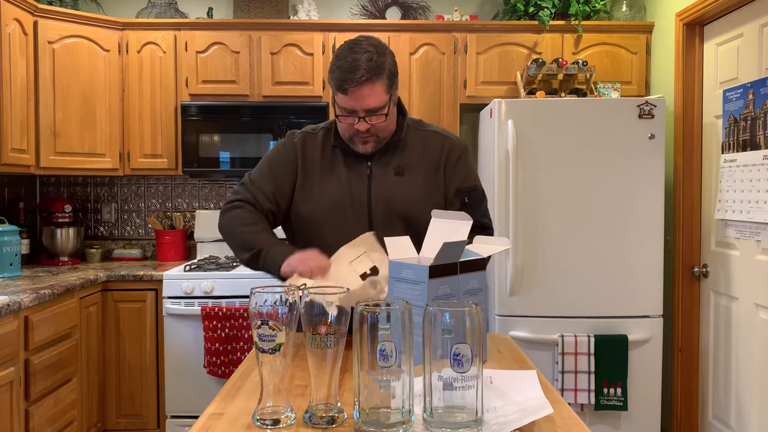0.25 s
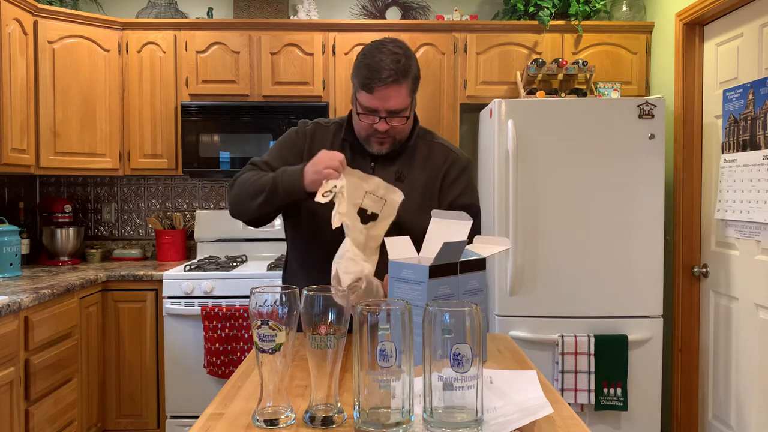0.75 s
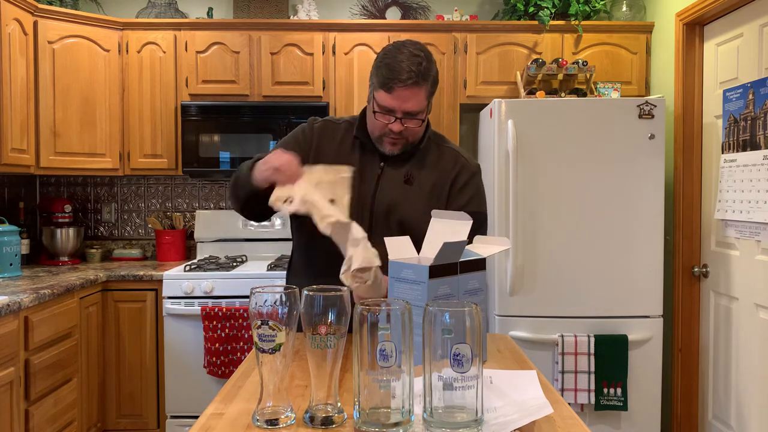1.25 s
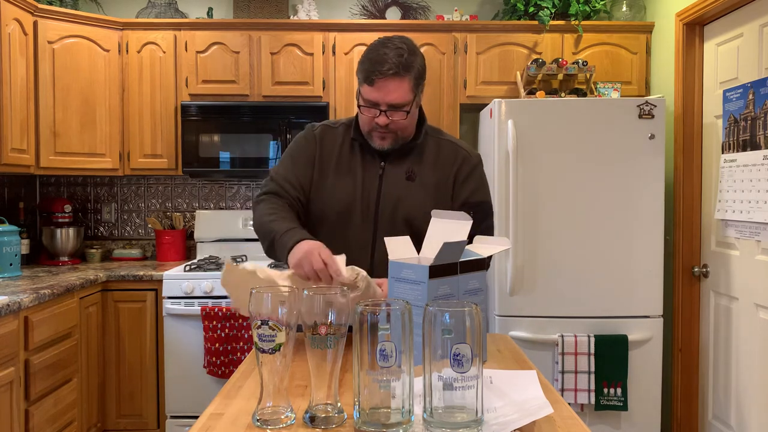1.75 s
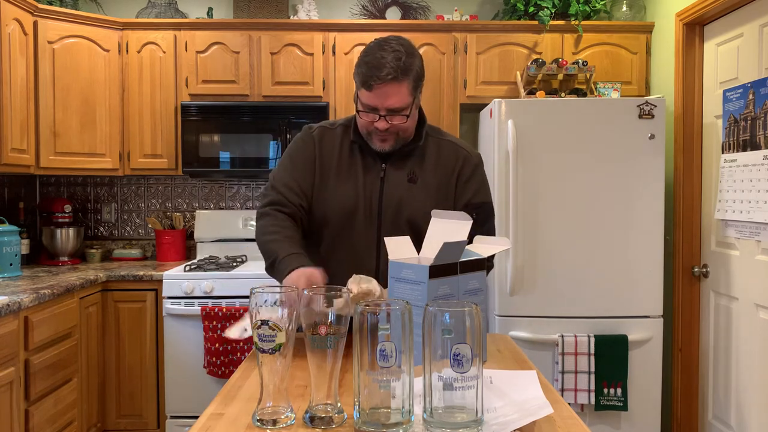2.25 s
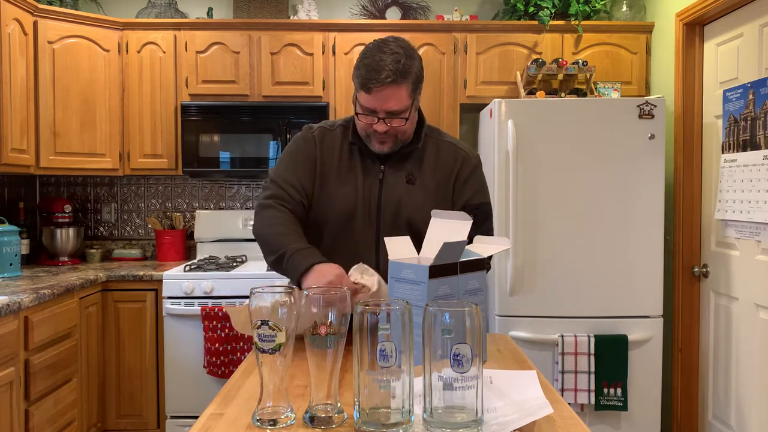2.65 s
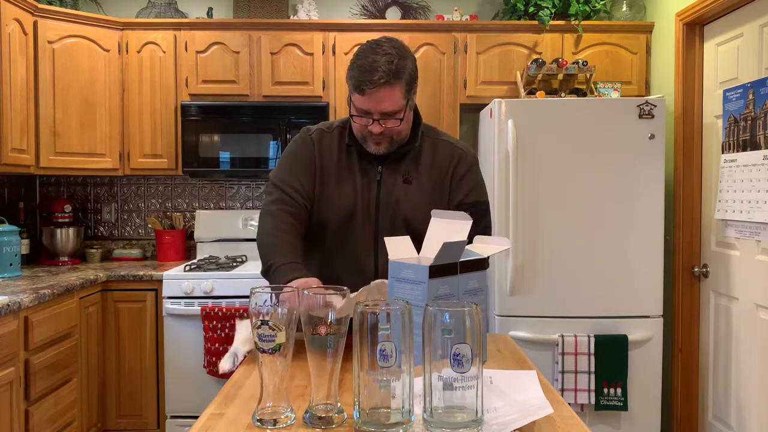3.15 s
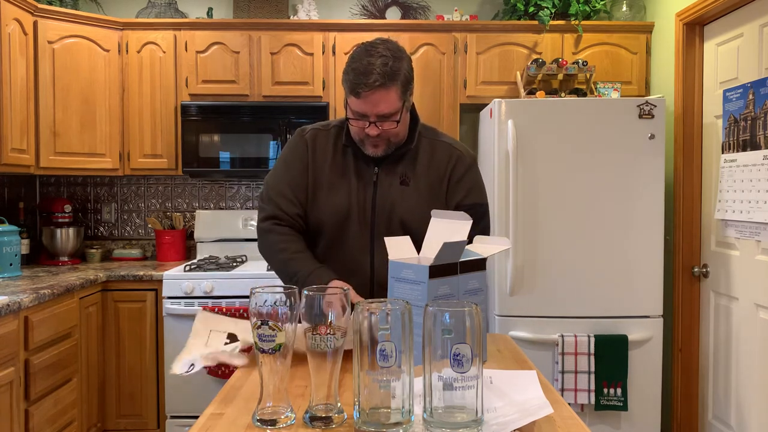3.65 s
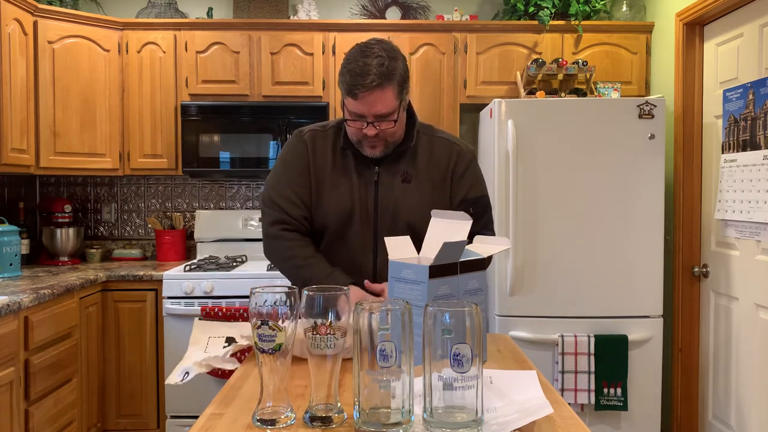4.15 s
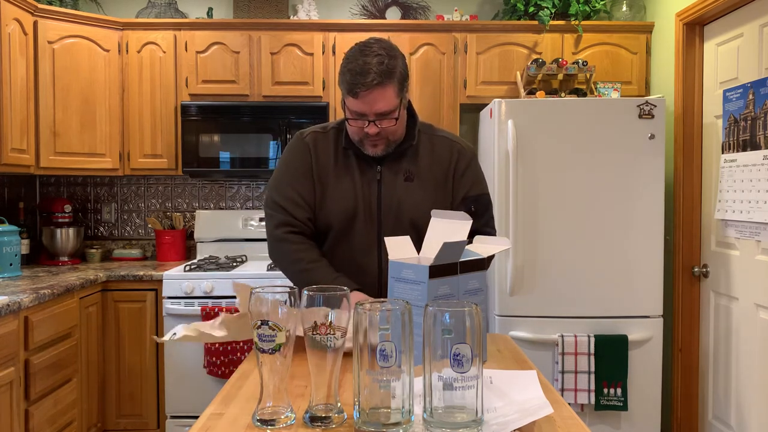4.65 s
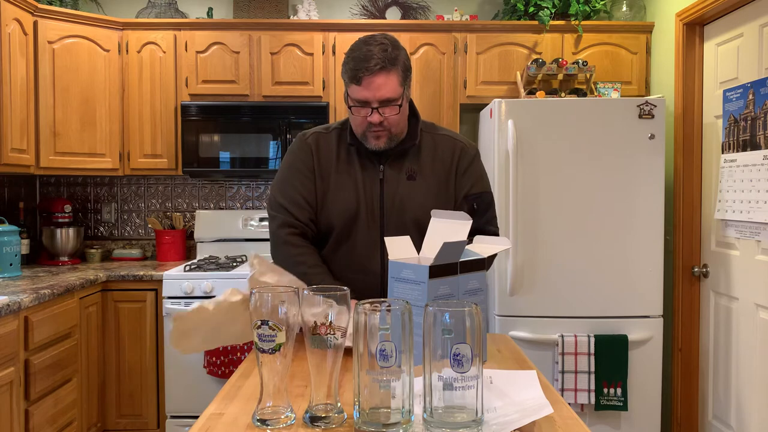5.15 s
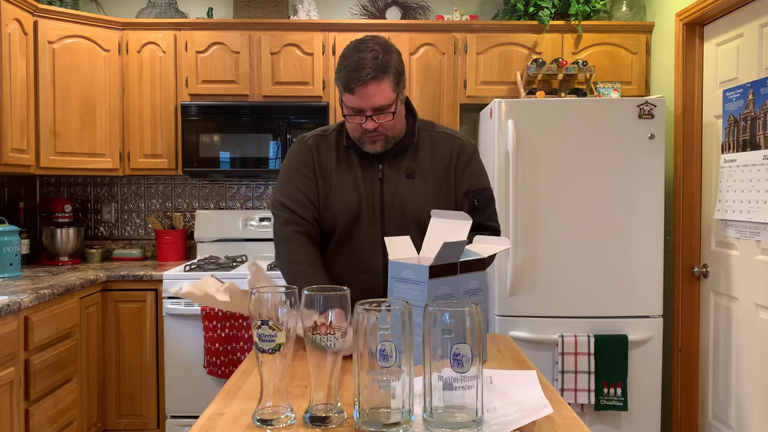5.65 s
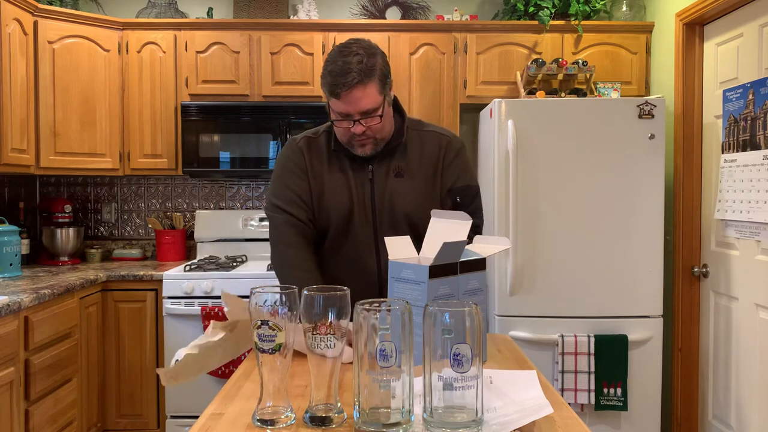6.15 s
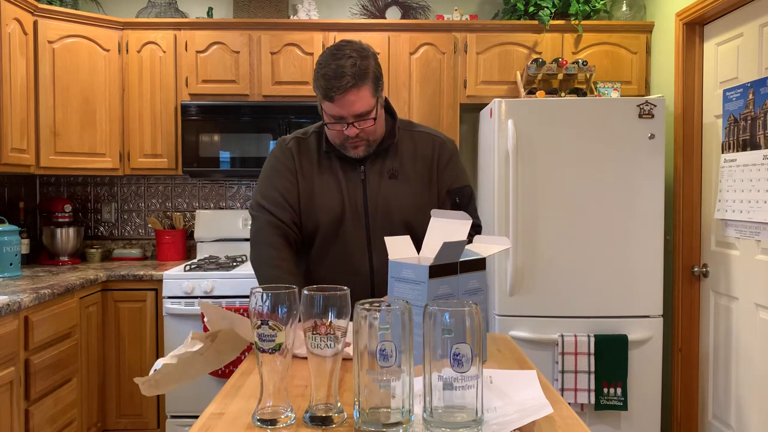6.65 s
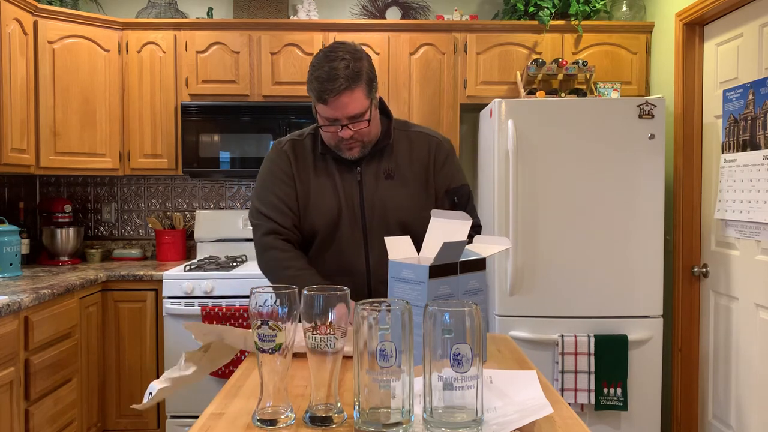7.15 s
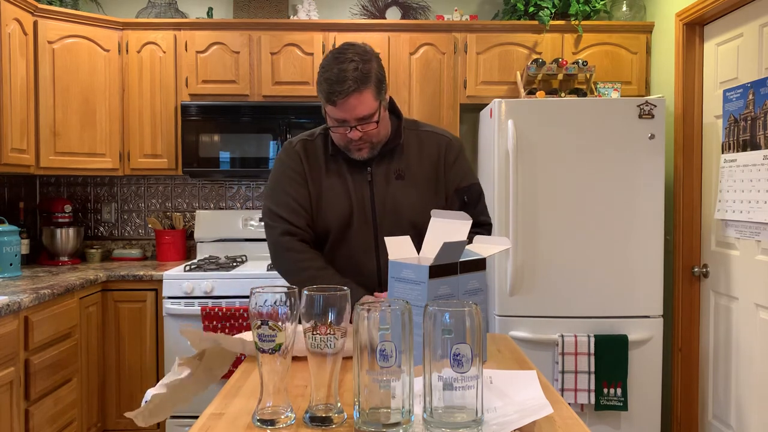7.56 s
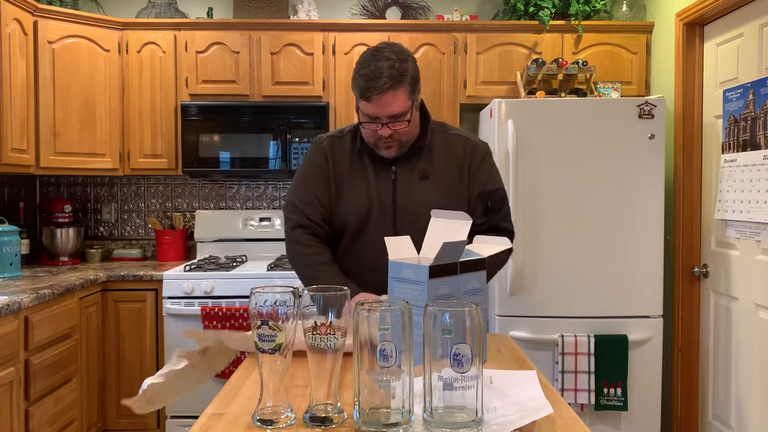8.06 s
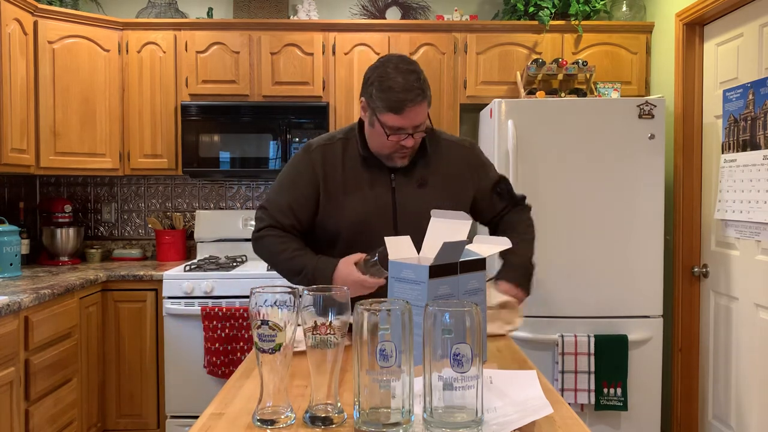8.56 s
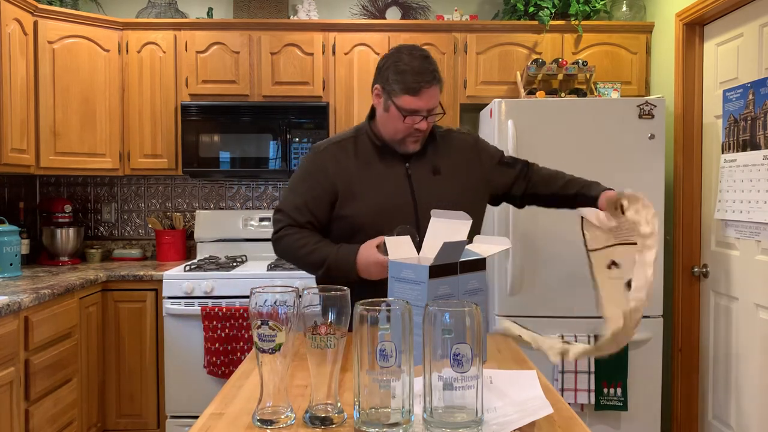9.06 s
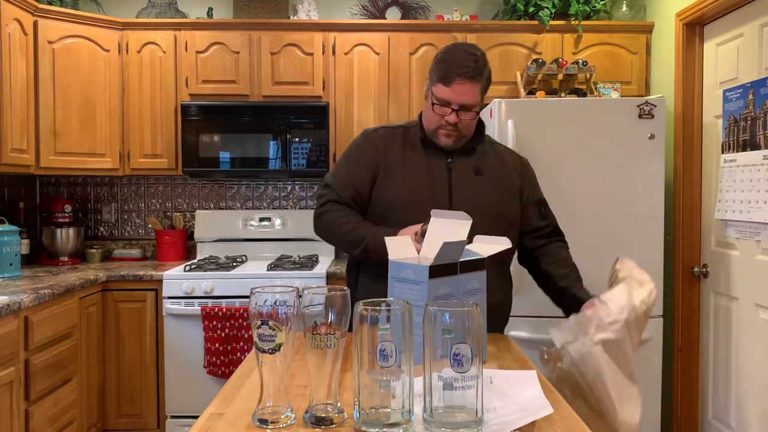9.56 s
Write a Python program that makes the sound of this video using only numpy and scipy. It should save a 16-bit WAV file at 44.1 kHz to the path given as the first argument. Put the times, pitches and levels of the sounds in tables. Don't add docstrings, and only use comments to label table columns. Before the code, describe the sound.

A reverberant kitchen with faint low room rumble and unsteady refrigerator hum, heard in stereo from a few metres away. From 0 s stiff packing paper crunches, with a low pop, boomy folds and crackle; bright snaps cluster near 0.75 to 0.9 s. Sharper pops and hissing slides run from 1.6 to 2 s, a strong tear cracks at 2.4 s, and a dense crumple peaks around 2.7 to 3 s. Hard snaps hit at 3.5 s, then uneven rustles follow. From 5.2 to 5.9 s the paper drags and pops loudly, with a flap and light touch at 5.8 s. At 6.4 s a wrapped glass knocks the wooden counter hard, hollow and woody, and standing glasses ring thinly. Softer, sparser crackles follow, with snaps near 7.9 and 8.5 s, thinning to near quiet around 9.4 s before a final small pop and light hissing rustle at 9.7 s.

```python
import sys
import numpy as np
from scipy import signal
from scipy.fft import rfft, irfft, next_fast_len
from scipy.io import wavfile
from scipy.ndimage import uniform_filter1d, minimum_filter1d, map_coordinates

SR = 44100
rng = np.random.default_rng(int(sys.argv[2]) if len(sys.argv) > 2 else 0)


def to_wav(sig):
    pcm = np.clip(np.atleast_2d(sig), -1, 1) * 32767
    pcm = np.round(pcm).astype(np.int16)
    wavfile.write(sys.argv[1], SR, pcm.T)


def magnitude_from_level(level_db):
    exponent = np.asarray(level_db, float) / 20
    return 10 ** exponent


N = 433062


def unit(x):
    return x / np.sqrt(np.mean(x ** 2) + 1e-20)


def along(points, hz):
    f, v = np.transpose(points)
    return np.interp(np.log(hz + 1), np.log(f + 1), v)


def curves(rows):
    s, *columns = np.transpose(rows)
    return [np.interp(np.arange(N) / SR, s, column) for column in columns]


def wobble(rate):
    points = rng.standard_normal(int(N * 400 / SR) + 4)
    return map_coordinates(points, [np.arange(N) * rate / SR])


def filtered(x, response):
    m = next_fast_len(N + SR // 2)
    return irfft(rfft(x, m) * response(np.fft.rfftfreq(m, 1 / SR)), m)[..., :N]


def coloured(x, spectrum):
    return unit(filtered(x, lambda hz: magnitude_from_level(along(spectrum, hz))))


def ring(modes, t, attack, scatter_db=0):
    total = 0
    for hz, db, t60 in modes:
        level_db = db - scatter_db * rng.standard_normal()
        total = total + magnitude_from_level(level_db - 60 * t / t60) * np.sin(2 * np.pi * hz * t)
    return total * (1 - np.exp(-t / attack))


def swell(t, middle_s, length_s):
    return np.exp(-np.square(2 * (t - middle_s) / length_s))


# (frequency [Hz], level [dB])
ROOM_AIR = [(15, -58), (25, -68), (37, -11), (95, 3.5), (167, 4.5), (438, -8), (501, -0.5), (588, -23.5),
            (1630, -23), (3260, -64), (15000, -46)]
# (time [s], level [dB])
HUM = [(0.0, -54), (0.93, -59.5), (6.18, -58.5), (6.48, -53), (6.67, -57), (7.63, -65), (9.6, -68.5),
       (9.82, -58)]


def background():
    t = np.arange(N) / SR
    air = magnitude_from_level(-55.0 + 1.78 * wobble(6.6)) * coloured(rng.standard_normal((2, N)), ROOM_AIR)
    hum = np.sin(2 * np.pi * 59.2 * t + 0.74 * wobble(2.3))
    hum *= magnitude_from_level(curves(HUM)[0] + 5.5 + 1.6 * wobble(6.5))
    whine = magnitude_from_level(-58.5 + 1.5 * wobble(7)) * np.sin(2 * np.pi * 506 * t + 0.3 * wobble(9))
    whine_fade = np.clip(t - 7.1, 0, 1)
    return air + (hum + whine * whine_fade) * [[1], [0.3]]


def creases(per_second, spread_db, clump_db):
    fires = rng.random(N) < per_second / SR
    size = magnitude_from_level(spread_db * np.minimum(rng.exponential(size=N), 2.2)) * rng.standard_normal(N)
    clumps = magnitude_from_level(clump_db * wobble(25) + 0.5 * clump_db * wobble(90))
    return clumps * (unit(fires * size) + 1.21 * rng.standard_normal(N))


# (time [s], effort [dB], sliding [dB])
HANDS = [(0.0, -38, -6), (0.7, -47, 3), (1.35, -45, -3.5), (1.55, -46.5, -20), (1.58, -41, 2.5),
         (2.15, -44.5, -1), (2.75, -36, -3.5), (3.35, -50, -6), (4.14, -38.5, -9.5), (5.2, -50.5, 2),
         (5.63, -41, -3.5), (5.97, -54.5, 6), (6.35, -42, 1.5), (7.05, -56, 2.5), (8.52, -43, 3),
         (9.1, -50.5, -0.5), (9.37, -75.5, -9.5), (9.82, -46, 10.5)]
# (frequency [Hz], level [dB])
BOOM = [(59, -24.5), (100, -11), (135, -23.5), (189, 5), (227, 3), (456, 4), (900, -10), (1170, -22),
        (1980, -120)]
CRUMPLE = [(380, -30), (650, -3), (1000, 0), (1500, -3), (2200, -6), (3200, -10), (4400, -18), (6500, -45)]
CRACKLE = [(2600, -0.5), (3600, -3.5), (5500, -2.5), (8000, -4.5), (9500, -59)]
HISS = [(7500, -12), (9000, 3.5), (11000, 0), (12600, -2.5), (14000, -9.5), (15600, -9), (16500, -79)]
FIZZ = [(12000, -34.5), (13500, 5), (15600, -3), (16500, -67.5)]


def paper():
    effort_db, slide_db = curves(HANDS)
    pops, (low, middle, edge) = snaps()
    drag_low, drag, drag_edge = drags()
    slip = slips()
    big = creases(per_second=500, spread_db=3.0, clump_db=2.5)
    small = creases(per_second=2500, spread_db=1.0, clump_db=1.5)

    boom_level = magnitude_from_level(0.68 * (effort_db + 46.5) - 54.0) + magnitude_from_level(-8.0) * low + drag_low
    crumple_level = magnitude_from_level(effort_db - 9.5) + magnitude_from_level(-14.5) * middle + drag
    crackle_level = magnitude_from_level(effort_db + 0.7 * slide_db - 11.5) + magnitude_from_level(-10.0) * edge + drag_edge
    hiss_level = magnitude_from_level(effort_db + 0.95 * slide_db - 15.0) + magnitude_from_level(-16.0) * edge + magnitude_from_level(-5.5) * drag_edge + slip
    fizz_level = magnitude_from_level(effort_db + 0.91 * slide_db - 25.0) + magnitude_from_level(-30.5) * edge + magnitude_from_level(-3) * slip

    boom = boom_level * coloured(big, BOOM)
    crumple = crumple_level * coloured(0.45 * big + small, CRUMPLE)
    crackle = crackle_level * coloured(0.049 * big + small, CRACKLE)
    hiss = hiss_level * coloured(0.42 * big + small, HISS)
    fizz = fizz_level * coloured(small, FIZZ)
    return pops + rustles(big + small) + boom + crumple + crackle + hiss + fizz


# (time [s], peak level [dB], pitch [Hz], time to fall 60 dB [s])
POPS = [(0.017, -16.5, 474, 0.11), (0.452, -27, 950, 0.018), (0.738, -24, 2300, 0.26),
        (0.745, -20, 3480, 0.054), (0.746, -29, 630, 0.27), (1.948, -21.5, 910, 0.14),
        (2.712, -32, 945, 0.051), (2.928, -33, 1110, 0.044), (4.579, -27, 1410, 0.068),
        (5.152, -37, 800, 0.068), (5.386, -27, 880, 0.11), (5.608, -16, 1700, 0.042),
        (6.274, -26, 830, 0.047), (7.51, -31, 2300, 0.092), (7.645, -34, 1160, 0.072),
        (7.67, -37, 1900, 0.12), (8.2, -35, 1500, 0.093), (8.565, -31, 1600, .12),
        (8.965, -32, 1020, 0.083), (1.653, -20, 2600, 0.26), (1.701, -23, 950, 0.18),
        (1.74, -21.5, 446, 0.095), (1.86, -15.5, 940, 0.043), (2.318, -26, 1050, 0.18),
        (2.466, -21, 1360, 0.094), (2.748, -26, 770, 0.037), (2.863, -22, 950, 0.13),
        (2.975, -15.5, 555, 0.057), (3.544, -15.5, 1390, 0.11), (4.017, -21, 755, 0.041),
        (4.184, -22.5, 470, 0.06), (4.66, -25.5, 537, 0.12), (4.898, -24.5, 1300, 0.59),
        (5.203, -30, 470, 0.12), (5.403, -19, 920, 0.2), (5.467, -20.5, 1020, 0.12),
        (5.581, -19, 1410, 0.064), (5.62, -14.5, 1820, 0.05), (5.821, -23, 1980, 0.045),
        (6.7, -27, 1140, 0.28), (7.468, -30, 960, 0.34), (7.549, -25, 477, 0.031),
        (7.612, -28.5, 1000, 0.66), (8.151, -22.5, 1010, 0.091), (8.271, -24.5, 890, 0.27),
        (9.693, -25.5, 1010, 0.22)]
# (time [s], peak level [dB], edge level [dB], boom level [dB], time to fall 60 dB [s])
FLURRIES = [(0.201, -30.5, -7, -11, 0.42), (0.73, -35, 3.5, -15, 0.078), (0.886, -21.5, -3, -25, 0.2),
            (0.906, -17.5, -19, -18, 0.21), (1.102, -35, -35, -15, 0.47), (1.205, -25, -24, -18, 0.23),
            (1.894, -23.5, -2, -11, 0.087), (2.123, -28, -16, -7, 0.075), (2.361, -20.5, -0.5, -8, 0.21),
            (2.945, -24.5, -13, -3, 0.42), (3.019, -19.5, -9, -24, 0.22), (3.405, -25.5, -10, -16, 0.55),
            (3.535, -25.5, -8, -22, 0.56), (3.915, -21.5, -12.5, -23, 0.44),
            (4.266, -22.5, -31, -17, 0.089), (4.501, -29.5, -9, -3, 0.27), (4.736, -25.5, -44, -10, 0.17),
            (5.078, -27, -37, -11, 0.24), (5.17, -26.5, -11, -10, 0.16), (6.119, -31, -4, -8, 0.47),
            (6.262, -29, 4, 0, 0.1), (6.809, -26.5, -6, -13, 0.13), (7.303, -29.5, -10, -1, 0.22),
            (7.361, -32.5, -13, -11, 0.12), (7.408, -25.5, -27, -9, 0.095), (7.456, -33, -24, 1.5, 0.11),
            (7.879, -19, -10, -30, 0.14), (7.981, -35, -50, -6, 0.13), (8.379, -39, -8, -14, 0.18),
            (8.524, -23.5, -12, -9.5, 0.18), (8.645, -21.5, -15, -4, 0.095), (9.105, -24, -29, -20, 0.19)]


def snaps():
    pops, flurry = np.zeros(N + SR), np.zeros((3, N + SR))
    t = np.arange(SR // 3) / SR
    start = 1 - np.exp(-t / 0.0007)
    events = []
    for s, db, edge_db, boom_db, t60 in FLURRIES:
        panel_hz = 492 * np.exp(0.053 * rng.standard_normal())
        events.append((s, db, panel_hz, -12, boom_db, 0, edge_db, t60))
    for s, db, hz, t60 in POPS:
        events.append((s, db, hz, -2, -13, -3.5, -22, t60))

    for s, db, hz, pop_db, boom_db, folds_db, edge_db, t60 in events:
        at = round(s * SR)
        dying = magnitude_from_level(db - 60 * t / np.clip(t60, 0.02, 0.4)) * start
        pop = magnitude_from_level(db + pop_db - 60 * t * hz / 11) * np.sin(2 * np.pi * hz * t) * start
        panel = unit(signal.lfilter(*signal.iirpeak(hz, 5, SR), rng.standard_normal(len(t))))
        pops[at:at + len(t)] += pop + magnitude_from_level(-17) * dying * panel
        build_up = 0.59 + 0.73 * (1 - np.exp(-t / (0.16 * abs(t60) + 1e-4)))
        flurry[:, at:at + len(t)] += magnitude_from_level([[boom_db], [folds_db], [edge_db]]) * dying * build_up
    return pops[:N], flurry[:, :N]


# (middle time [s], level [dB], length [s], pitch [Hz])
RUSTLES = [(0.03, -42, 0.11, 800), (0.23, -39.5, 0.08, 535), (0.245, -49, 0.094, 1690),
           (0.44, -44, 0.028, 680), (0.465, -46, 0.034, 940), (0.658, -48, 0.13, 600),
           (0.79, -47, 0.059, 480), (0.93, -39.5, 0.05, 285), (1.108, -48, 0.034, 546),
           (1.346, -49.5, .1, 477), (1.442, -52, 0.03, 495), (1.73, -47, 0.055, 199),
           (1.966, -41, 0.056, 248), (2.126, -50, 0.02, 900), (2.558, -46, 0.035, 470),
           (2.608, -51, 0.066, 447), (2.767, -38, .04, 800), (3.045, -44, 0.088, 525),
           (3.43, -52, 0.042, 920), (3.724, -41.5, 0.027, 494), (3.917, -39, 0.05, 546),
           (4.096, -50, 0.083, 500), (4.327, -51, 0.071, 596), (4.953, -45, .06, 1300),
           (5.08, -47, .02, 450), (5.21, -50, .07, 476), (5.562, -40, 0.045, 447),
           (5.598, -42.5, 0.061, 430), (5.681, -41, 0.04, 470), (5.894, -49, 0.065, 540),
           (6.803, -47, 0.03, 500), (6.932, -49, 0.026, 400), (6.998, -56.5, 0.071, 340),
           (7.2, -52, 0.099, 550), (7.368, -49, .05, 486), (7.465, -44, 0.069, 497), (7.67, -54, .07, 1850),
           (7.898, -41, 0.091, 1300), (7.9, -47, 0.12, 480), (8.017, -45, 0.046, 470),
           (8.207, -48, 0.078, 1800), (8.297, -53, .06, 880), (8.573, -43, 0.053, 445),
           (8.715, -57, 0.024, 500), (9.064, -46, 0.023, 400)]


def rustles(grit):
    out = np.zeros(N)
    for s, db, length, hz in RUSTLES:
        near = np.arange(max(round((s - 0.2) * SR), 0), round((s + 0.2) * SR))
        rattle = unit(signal.lfilter(*signal.iirpeak(hz, 3.6, SR), grit[near]))
        out[near] += magnitude_from_level(db) * swell(near / SR, s, length) * rattle
    return out


# (middle time [s], level [dB], length [s], edge level [dB])
DRAGS = [(0.565, -57.5, 0.12, 19), (3.476, -63, 0.3, -3), (3.683, -57.5, 0.087, 19), (4.6, -53, 0.034, -6),
         (4.943, -50.5, 0.063, -9), (5.213, -41.5, 0.1, 6), (5.606, -38.5, 0.1, 3), (5.68, -43, 0.035, -27),
         (6.085, -49, 0.077, 0), (5.831, -54, 0.027, 20), (6.927, -64, 0.076, 28), (7.199, -57, 0.061, 14),
         (7.685, -62, 0.27, 5), (0.242, -57, 0.047, -5), (1.92, -41.5, 0.085, 10), (8.573, -53, 0.026, -14),
         (8.217, -54, 0.064, -22), (8.455, -63.5, 0.093, 30.5), (9.017, -56, 0.077, 13),
         (9.482, -70, 0.16, 12), (9.594, -70, 0.11, 23.5)]


def drags():
    t = np.arange(N) / SR
    out = np.zeros((3, N))
    for s, db, length, edge_db in DRAGS:
        layers_db = np.array([[-3], [0], [edge_db - 18.5]])
        out += magnitude_from_level(db + layers_db) * swell(t, s, length)
    return out


# (time [s], peak level [dB], pitch [Hz])
TICKS = [(0.451, -38, 960), (0.743, -22, 2300), (0.905, -24, 684), (1.654, -24, 1670), (1.719, -23, 463),
         (1.86, -17, 974), (1.948, -18, 458), (2.124, -32, 463), (2.319, -32, 1040), (2.372, -23, 988),
         (2.467, -29, 1350), (2.748, -27, 770), (2.864, -21, 958), (3.535, -16, 750), (3.552, -13, 1090),
         (3.927, -24, 738), (4.021, -22, 1250), (4.184, -38, 455), (4.66, -38, 544), (4.898, -29, 1340),
         (5.203, -34, 2280), (5.203, -25, 471), (5.403, -34, 907), (5.466, -23, 974), (5.583, -23, 452),
         (5.606, -12, 1400), (5.621, -21, 1010), (5.677, -25, 452), (5.834, -25, 471), (6.7, -20, 1070),
         (6.808, -25, 495), (6.903, -35, 450), (7.412, -28, 544), (7.548, -30, 452), (7.647, -24, 1110),
         (7.88, -24, 762), (8.151, -23, 1070), (8.272, -35, 918), (8.387, -23, 538), (8.526, -24, 813),
         (8.647, -26, 482), (8.885, -36, 1200), (9.117, -36, 509), (9.694, -38, 974)]


def ticks():
    out, t = np.zeros(N + SR), np.arange(SR // 20) / SR
    for s, db, hz in TICKS:
        at = round(s * SR)
        life_s = 5.6 / hz
        tone = magnitude_from_level(-60 * t / life_s) * np.sin(2 * np.pi * hz * t)
        overtone = magnitude_from_level(-4 - 60 * t / (0.83 * life_s)) * np.sin(2 * np.pi * 2.23 * hz * t)
        out[at:at + len(t)] += magnitude_from_level(db - 5.5) * (tone + overtone) * (1 - np.exp(-t / 0.0002))
    return out[:N]


# (time [s], peak level [dB], pitch [Hz])
FLAPS = [(0.561, -33, 197), (2.31, -24, 201), (2.462, -26, 183), (2.97, -26.5, 172), (4.508, -31, 199),
         (4.664, -29.5, 182), (5.498, -29, 190), (5.836, -11.5, 516), (5.86, -22.5, 181),
         (7.848, -21.5, 440), (8.381, -24.5, 220), (8.969, -30.5, 245)]


def flaps():
    out, t = np.zeros(N + SR), np.arange(SR // 3) / SR
    for s, db, hz in FLAPS:
        at = round(s * SR)
        rough = unit(signal.lfilter(*signal.iirpeak(hz, 2, SR), rng.standard_normal(len(t))))
        push = magnitude_from_level(db - 60 * t * hz / 10) * (1 - np.exp(-t / 0.004))
        out[at:at + len(t)] += push * (np.sin(2 * np.pi * hz * t) + 0.69 * rough)
    return out[:N]


# (middle time [s], level [dB], length [s])
SLIPS = [(0.75, -50, 0.028), (0.9, -44, 0.034), (1.193, -53, 0.077), (1.716, -52, 0.083),
         (1.884, -45, 0.041), (2.718, -74, 0.11), (4.317, -56, 0.053), (8.425, -53.5, 0.15),
         (8.626, -58, 0.39)]


def slips():
    t = np.arange(N) / SR
    return sum(magnitude_from_level(db) * swell(t, s, length) for s, db, length in SLIPS)


# (time [s], peak level [dB], brightness [-1 dull to 1 thin])
CRACKS = [(1.07, -22, 0.87), (1.1444, -32, .9), (1.563, -25.5, 0.7), (2.294, -24, 0.21), (2.362, -12, 0.31),
          (3.021, -12, 0.3), (4.2983, -24, .9), (4.592, -38, .5), (4.76, -48, .5), (5.2046, -17, -0.27),
          (6.6403, -34, 0), (6.905, -35, .3), (7.876, -18, -0.021), (8.093, -38, .8), (8.151, -36, -1.1),
          (8.271, -39, -.3), (8.526, -32, -.5), (8.645, -29, -0.41), (9.106, -25, -.9), (9.694, -29, -0.19),
          (1.654, -32, -.5), (3.535, -23, -0.39), (5.583, -35, -0.42)]


def cracks():
    out, t = np.zeros(N + SR), np.arange(SR // 8) / SR
    for s, db, bright in CRACKS:
        at = round(s * SR)
        grit = rng.standard_normal(len(t) + 1)
        thinning = [1 + 0.28 * min(bright, 0), -np.clip(bright, 0, 1)]
        dulling = [1, 0.58 * np.clip(bright, -1, 0)]
        rasp = signal.lfilter(thinning, dulling, grit)[1:]
        fade = magnitude_from_level(-60 * t / 0.011) + magnitude_from_level(-20 - 60 * t / 0.035)
        out[at:at + len(t)] += magnitude_from_level(db - 8.0) * rasp * fade
    return filtered(out[:N], lambda hz: 1 / (1 + 1j * hz / 9000))


# (time [s], peak level [dB], hardness [dB], weight [dB])
BUMPS = [
    (5.796, -35.5, -26, 0),
    (5.834, -26, -20, -12),
    (6.352, -33.5, -20.5, -21),
    (6.423, -4, -4.5, -15),
]
# (frequency [Hz], level [dB], time to fall 60 dB [s])
COUNTER = [(172, -12, 0.52), (247.4, -3, 0.25), (278, -5.5, 0.29), (348, 0.5, 0.2), (380, -7.5, 0.15),
           (482, -2, .22), (546, 2.5, .2), (598, -5.5, .22), (628, -5, 0.14), (727, -8, 0.16),
           (792, -7.5, 0.14), (844, -5.5, 0.14), (1000, -24.5, 0.14), (1220, -21, 0.16)]
# (frequency [Hz], level [dB])
THUD = [(50, -40), (110, -8.5), (330, 1), (1050, -14), (1300, -20.5), (2200, -29.5), (3000, -42.5)]


def counter():
    out, t = np.zeros(N + 2 * SR), np.arange(SR) / SR
    board = coloured(rng.standard_normal(N), THUD)
    clack = [(1030, 2, 0.03), (860, -7, 0.03), (1800, -16, 0.045), (2400, -17, 0.01)]
    hollow = [(105.0, -8.5, 0.51), (187.0, 8.0, 0.16)]
    rebounds = [(s + 0.05, db - 10.5, hard_db - 6, weight_db) for s, db, hard_db, weight_db in BUMPS]
    for s, db, hard_db, weight_db in list(BUMPS) + rebounds:
        at = round(s * SR)
        contact = magnitude_from_level(hard_db + 6) * ring(clack, t, attack=0.0008)
        top = magnitude_from_level(-11.0) * ring(COUNTER, t, attack=0.005, scatter_db=4.5)
        thud = magnitude_from_level(-5.0 - 60 * t / 0.14) * board[at:at + SR] * (1 - np.exp(-np.square(t / 0.005)))
        cabinet = magnitude_from_level(weight_db - 5.0) * ring(hollow, t, attack=0.008, scatter_db=3.0)
        out[at:at + SR] += magnitude_from_level(db) * (contact + top + thud + cabinet)
    return out[:N]


# (frequency [Hz], level [dB], time to fall 60 dB [s])
GLASSES = [(3418, -4, .6), (3480, -8, .45), (3678, 2, .52), (3686.5, 1, .52), (4204, -6, .3),
           (5378, -3, .4), (5391, -8, .3), (6503, -14, .3)]


def glasses():
    out, t = np.zeros(N + SR), np.arange(SR) / SR
    quick = ring(GLASSES, t, attack=0.002)
    slow = ring([(2218, 10, 0.75), (2230.5, 7, 0.75)], t, attack=0.3)
    at = round((BUMPS[-1][0] + 0.01) * SR)
    out[at:at + SR] = magnitude_from_level(-41 + 2.5 * wobble(40)[:SR]) * (quick + slow)
    return out[:N] * [[1], [0.5]]


# (frequency [Hz], time to fall 60 dB [s])
KITCHEN = [(100, 0.8), (500, 0.48), (2000, 0.5), (6000, 0.3), (14000, 0.22)]


def kitchen(x, wet_db):
    out, count = np.zeros((2, N)), 11
    phase = np.arange(N) / SR / 0.6
    for k in range(count):
        distance = abs((phase * count - k + count / 2) % count - count / 2)
        share = np.sqrt(np.maximum(1 - distance, 0))
        hz, t, z = signal.stft(rng.standard_normal((2, SR // 2)), SR, nperseg=256)
        tail = signal.istft(z * magnitude_from_level(-60 * t / along(KITCHEN, hz)[:, None]), SR, nperseg=256)[1]
        paths = magnitude_from_level(wet_db) * np.pad(tail / np.linalg.norm(tail[0]), ((0, 0), (260, 0)))
        near = rng.standard_normal((2, 1500)) * magnitude_from_level(-60 * np.arange(1500) / 1500)
        near /= np.linalg.norm(near, axis=1, keepdims=True)
        paths[:, :1500] += near * [[0.45], [1.25]]
        paths[0, 0] += 0.8
        out += signal.fftconvolve((x * share)[None], paths, axes=1)[:, :N]
    return out


# (frequency [Hz], likeness [0 to 1])
ALIKE = [(60, .95), (290, .92), (470, .8), (700, .5), (1400, .2), (6300, .3), (8300, .8), (15000, .85)]
# (frequency [Hz], phase [radians])
LEAD = [(0, 0), (3000, .9), (6000, 0), (8550, -3.14), (11100, -6.28), (13350, -9.42), (15700, -12.57)]


def ports(pair):
    def mixing(hz):
        turn = np.arccos(np.clip(along(ALIKE, hz), -1, 1)) / 2
        return np.array([np.cos(turn), np.sin(turn)])

    def lag(hz):
        return np.exp(0.5j * np.interp(hz, *np.transpose(LEAD)) * [[1], [-1]])

    shared, odd = filtered(pair, mixing)
    return filtered(np.array([shared + odd, shared - odd]), lag)


def scene():
    bumps = counter()
    tears = cracks() + ticks()
    sound = kitchen(paper() + 0.5 * tears + flaps(), wet_db=-7)
    sound += 0.59 * tears * [[1], [0.1]]
    sound += 0.77 * kitchen(bumps, wet_db=-7) + 0.3 * bumps * [[1], [0.1]]
    return ports(sound + glasses() + background()) * magnitude_from_level([[0.4], [-0.4]])


def limited(x):
    need = np.minimum(1, 0.9 / (abs(x).max(axis=0) + 1e-9))
    return x * uniform_filter1d(minimum_filter1d(need, size=601), size=301)


def band_limit(x):
    return signal.sosfilt(signal.butter(12, 16990, fs=SR, output="sos"), x)


def record(dry):
    hiss = magnitude_from_level(-75.5) * np.diff(rng.standard_normal(dry.shape), prepend=0)
    mix = limited(dry + hiss)
    return band_limit(mix)


dry = scene()
out = record(dry)
to_wav(out)
```